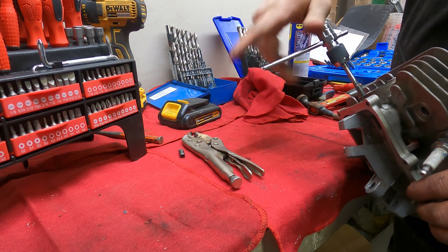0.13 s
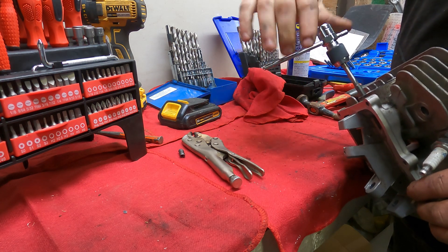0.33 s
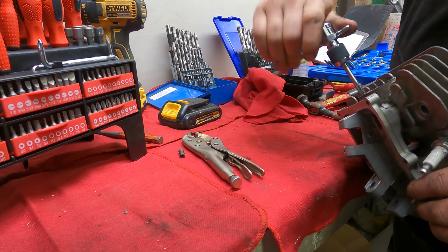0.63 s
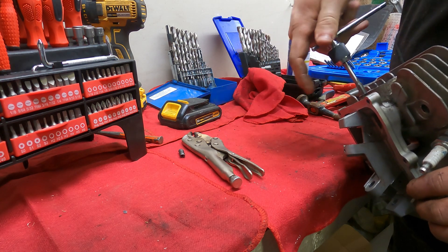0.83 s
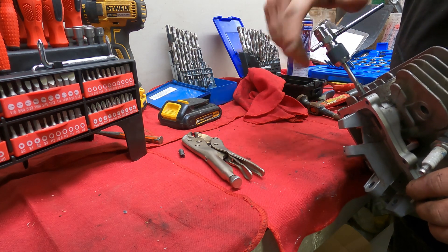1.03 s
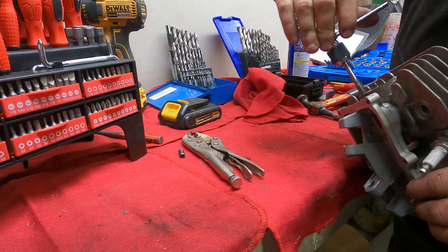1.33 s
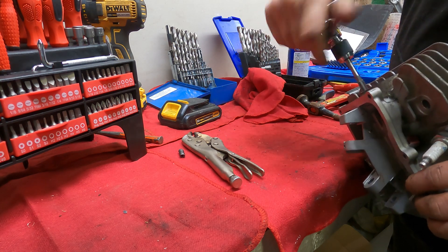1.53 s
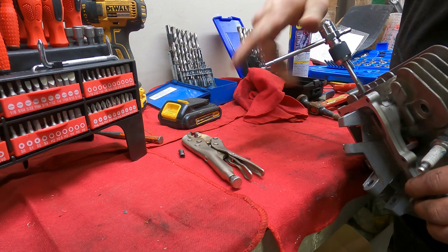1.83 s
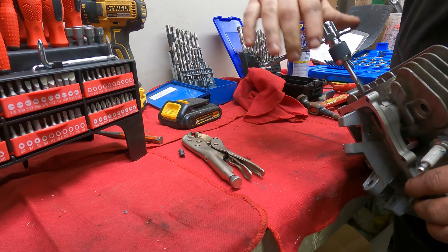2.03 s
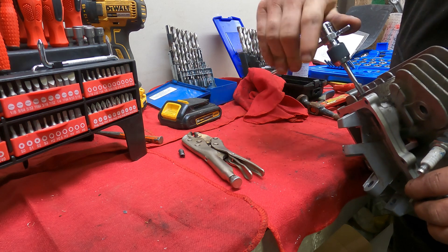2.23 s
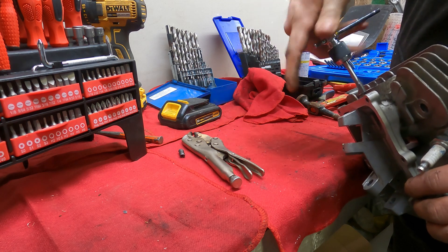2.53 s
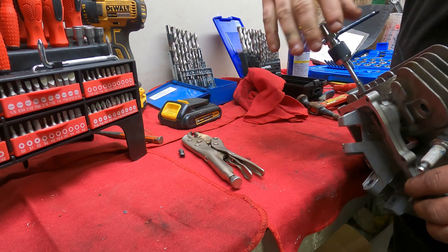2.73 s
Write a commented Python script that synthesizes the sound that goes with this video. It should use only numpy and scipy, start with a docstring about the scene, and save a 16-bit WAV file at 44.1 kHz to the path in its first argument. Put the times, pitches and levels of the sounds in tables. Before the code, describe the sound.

A steel tap wrench is spun by hand in a metal casting; its loose bar clinks sharply early and again late, with three short scraping slides between, over soft low bench thuds in a quiet room, closely miked.

```python
"""A T-handled tap wrench is spun by hand into a small engine casting: its loose steel cross-bar clicks in the
head (noise bursts and ringing modes), slides through it three times and twice drops against its stop
(the slides are rough friction noise that rings the same modes). Fingers brush the bar and a hand pats
the casting (soft noise swells). The casting rocks on a cloth-covered bench with dull thuds (low decaying
sines and rumble). Behind this lie the faint grind of the thread and the hiss of a quiet room (steady noise)."""
import sys
import numpy as np
from scipy import signal
from scipy.fft import rfft, irfft
from scipy.io import wavfile

SR = 44100
rng = np.random.default_rng(int(sys.argv[2]) if len(sys.argv) > 2 else 0)


def master_out(mix):
    """Clip the mix to full scale and print it as 16-bit PCM to the path in sys.argv[1]."""
    frames = np.transpose(np.atleast_2d(mix))
    ceiling = np.clip(frames, -1, 1)
    pcm = np.round(ceiling * 32767).astype(np.int16)
    wavfile.write(sys.argv[1], SR, pcm)


N = 127890  # length in samples
T = np.arange(N) / SR  # time in seconds
HZ = np.maximum(np.arange(N // 2 + 1) * SR / N, 1)  # frequency of each spectrum bin


def from_db(db):
    """Turn decibels into gain."""
    return 10 ** (np.asarray(db) / 20)


def rms_one(x):
    """Scale a signal to an rms of 1."""
    return x / np.sqrt(np.mean(x ** 2) + 1e-30)


def at_hz(points, hz):
    """Read a table of (Hz, value) between its points, on a log-frequency axis."""
    table_hz, values = np.transpose(points)
    return np.interp(np.log(hz), np.log(table_hz), values)


def level_over_time(points):
    """Turn a table of (seconds, dB) into a smoothly moving gain."""
    return from_db(np.interp(T, *np.transpose(points)))


def panned(db):
    """Left and right gains for a left-minus-right level in dB."""
    return from_db(np.array([[.5], [-.5]]) * db)


# How alike the two sides of the noise are. Each row: frequency in Hz, likeness from 0 (unrelated) to 1 (same).
SIDE_LIKENESS = [(60, 0.95), (150, 0.89), (350, 0.61), (1000, 0.68), (3000, 0.55), (8000, 0.88),
                 (13000, 0.48)]
# How the sound leans to one side. Each row: frequency in Hz, left minus right in dB.
SIDE_BALANCE = [(60, -.5), (170, -3.5), (350, -6), (1300, -2.5), (2800, 1), (5200, -1.5), (9000, 0),
                (13000, 6)]


def coloured(spectrum, low=10, high=SR, drive=1, tilt_db=0):
    """Stereo noise of rms 1 with a given spectrum from low to high Hz; drive shapes it in time first."""
    mid, side = rfft(rng.standard_normal((2, N)) * drive)
    alike = np.clip(at_hz(SIDE_LIKENESS, HZ), 0, 1)
    # The side part enters left and right with opposite signs
    both = np.sqrt(1 + alike) * mid + np.sqrt(1 - alike) * side * [[1], [-1]]
    in_band = (HZ >= low) * (HZ < high)
    colour = from_db(at_hz(spectrum, HZ) + tilt_db) * in_band
    return rms_one(irfft(both * panned(at_hz(SIDE_BALANCE, HZ)) * colour, N))


def roughness(depth_db, rate):
    """Stick and slip: a gain that wanders between random values, rate of them a second."""
    wander = np.interp(T * rate, np.arange(N), rng.standard_normal(N))
    return rms_one(from_db(depth_db * wander))


def tone(hz):
    """A sine of rms 1 with a random starting phase."""
    return np.sqrt(2) * np.sin(2 * np.pi * (hz * T + rng.random()))


def swell_and_decay(t, db, t60, rise_s):
    """A blow's loudness: a quick rise, then a fall of 60 dB every t60 seconds."""
    return from_db(db - 60 * t / t60) * (1 - np.exp(-t / rise_s))


def ringing(times, levels_db, t60, rise_s):
    """Envelope of a vibration: each blow adds energy, which then dies away."""
    energy = np.zeros(N)
    for s, db in zip(times, levels_db):
        start = max(int(s * SR), 0)
        t = T[:min(N - start, SR // 2)]  # each blow is followed for half a second
        energy[start:start + len(t)] += swell_and_decay(t, db, t60, rise_s) ** 2
    return np.sqrt(energy)


# Colour of the quiet room. Each row: frequency in Hz, relative level in dB per Hz.
ROOM_COLOUR = [(25, 3), (60, -7), (110, -7.5), (175, 0), (290, -6.5), (450, -18), (700, -23), (1200, -20.5),
               (2000, -22.5), (3400, -28.5), (4600, -28.5), (6500, -24), (9000, -32.5), (10300, -47),
               (15000, -49)]


def quiet_room():
    """Steady, soft noise of the room."""
    room_db = -62.5
    return from_db(room_db) * coloured(ROOM_COLOUR)


# Loudness of the grinding thread. Each row: time in seconds, level in dB.
THREAD_LEVEL = [(0, -52.5), (0.55, -59.5), (0.77, -51.5), (1.1, -62), (1.3, -57.5), (1.5, -49),
                (1.75, -53.5), (2.05, -61), (2.4, -54), (2.72, -72)]
# Colour of the grinding. Each row: frequency in Hz, relative level in dB per Hz.
THREAD_SPECTRUM = [(40, 8), (170, 10), (300, 1), (450, -11), (700, -27), (1050, -16.5), (1800, -24.5),
                   (5000, -22), (12000, -44.5)]


def thread_grind():
    """The tap grinds faintly in its thread as it turns: noise that grows and fades."""
    return level_over_time(THREAD_LEVEL) * coloured(THREAD_SPECTRUM)


THUD_RISE_S, DEEP_T60_S, HOLLOW_T60_S = .01, 0.31, 0.27


def boom(s, db, hz, t60):
    """A low mode swelling from rest at s seconds and dying away."""
    t = np.maximum(T - s, 0)
    return np.sqrt(2) * np.sin(2 * np.pi * hz * t) * swell_and_decay(t, db, t60, THUD_RISE_S)


# Rocks of the casting on the bench; its seating sets the pitch.
# Each row: start in seconds, deep level in dB, deep pitch in Hz, hollow level in dB, hollow pitch in Hz.
BENCH_THUDS = [(0.001, -49, 82.2, -51.5, 173.5), (0.078, -65, 45.6, -45.5, 177),
               (0.135, -56, 45, -48.5, 169), (0.249, -34, 70.6, -39.5, 131.6),
               (0.279, -33.5, 78.9, -38, 112.4), (0.404, -45, 72.6, -44, 169),
               (0.643, -47.5, 80.5, -47, 169.4), (0.713, -72, 68.4, -47, 164.5),
               (0.806, -35.5, 67.3, -45.5, 158), (0.861, -34, 58.6, -52, 141),
               (0.932, -40, 67, -34.5, 134.4), (0.983, -63, 102, -41.5, 164),
               (1.139, -59, 52, -48.5, 183.4), (1.201, -63, 50.6, -49.5, 180), (1.344, -47, 67, -38, 133.7),
               (1.455, -71, 71, -59, 131.5), (1.536, -71, 45, -59, 215), (1.61, -38, 81.7, -42, 110),
               (1.649, -40, 75.5, -43, 145.5), (1.774, -42.5, 68, -40, 127.7),
               (1.903, -37.5, 73.6, -36, 134), (2.108, -42, 68, -50.5, 123), (2.179, -47, 72, -54, 178.6),
               (2.228, -67, 82, -47, 169), (2.292, -35.5, 83.1, -36, 117), (2.343, -35.5, 79, -41, 123),
               (2.42, -44, 61.7, -55, 187), (2.567, -57, 92, -44, 121.3), (2.606, -50, 81, -35, 171.7)]
# The deep and the hollow range of the bench's dense rumble.
# Each row: lower edge in Hz, level in dB added to the thud's, t60 in seconds.
RUMBLE_RANGES = [(19.8, -3.5, .28), (110, -5, 0.37)]
# Colour of that rumble. Each row: frequency in Hz, relative level in dB per Hz.
RUMBLE_COLOUR = [(22, -10.5), (45, -4.5), (70, -1), (100, -6), (165, 8.5), (210, -9), (310, -14.5),
                 (420, -31.5), (600, -39)]
# Upper modes of the bench. Each row: frequency in Hz, level in dB added to the hollow one, t60 in seconds.
UPPER_BENCH_MODES = [(177, -11.5, 0.27), (232.6, -14.5, 0.14), (319.7, -18.5, 0.19)]


def bench_thuds():
    """Soft pushes through the casting set the bench booming: two low sines, dense rumble, upper modes."""
    times, deep, _, hollow, _ = np.transpose(BENCH_THUDS)
    out = 0
    for s, deep_db, deep_hz, hollow_db, hollow_hz in BENCH_THUDS:
        out = out + boom(s, deep_db, deep_hz, DEEP_T60_S)
        out = out + boom(s, hollow_db, hollow_hz, HOLLOW_T60_S)
    # Each range ends where the next begins
    tops = [row[0] for row in RUMBLE_RANGES[1:]] + [RUMBLE_COLOUR[-1][0]]
    for (low, db, t60), high, level in zip(RUMBLE_RANGES, tops, (deep, hollow)):
        out = out + coloured(RUMBLE_COLOUR, low, high) * ringing(times, level + db, t60, THUD_RISE_S)
    for hz, db, t60 in UPPER_BENCH_MODES:
        mode = tone(hz) * ringing(times, hollow + db, t60, THUD_RISE_S)
        out = out + panned(at_hz(SIDE_BALANCE, hz)) * mode
    return out


# Pats of the hand on the casting. Each row: start in seconds, level in dB.
HAND_PATS = [(0.756, -47), (1.372, -61)]
# Colour of a pat. Each row: frequency in Hz, relative level in dB per Hz.
PAT_COLOUR = [(200, -31), (420, 10), (600, -7), (1000, -21), (2500, -31), (9000, -55)]


def hand_pats():
    """Soft, dull touches of the hand: short bursts of mostly low noise."""
    times, levels = np.transpose(HAND_PATS)
    return coloured(PAT_COLOUR) * ringing(times, levels, t60=0.1, rise_s=0.0069)


SLIPS_PER_S = 500  # fast stick and slip of skin or steel

# Fingers brush along the bar.
# Each row: moment of the peak in seconds, level in dB, rise time in seconds, fall time in seconds.
FINGER_BRUSHES = [(0.887, -44.5, 0.0095, .014), (1.536, -42.5, 0.0072, 0.01), (1.562, -46, 0.0067, 0.011),
                  (2.42, -47.5, 0.01, 0.016)]
# Colour of a brush. Each row: frequency in Hz, relative level in dB per Hz.
BRUSH_COLOUR = [(200, -26), (330, 10), (480, -1), (680, -19), (1000, 1), (1110, -12.5), (1200, 8),
                (1400, -2), (1720, -6.5), (1860, 8), (2050, -13.5), (2600, -4), (3600, -17), (7000, -22),
                (14000, -45)]


def finger_brushes():
    """Skin drags briefly over the steel: rough noise that swells and fades."""
    swell = 0
    for peak_s, db, rise, fall in FINGER_BRUSHES:
        from_peak = (T - peak_s).clip(-1, 1)  # the limits keep cosh from overflowing
        swell = swell + from_db(db) / np.cosh(from_peak / np.where(T < peak_s, rise, fall))
    return swell * coloured(BRUSH_COLOUR, drive=roughness(2.5, SLIPS_PER_S))


# The bar runs through the head, one list a slide. Each row: time in seconds, level in dB.
BAR_SLIDES = [
    [(0.55, -79), (0.585, -53.5), (0.645, -50.5), (0.675, -46.5), (0.79, -43.5), (0.835, -49), (0.88, -72),
     (0.95, -78)],
    [(1.35, -65.5), (1.45, -58), (1.475, -49), (1.55, -44.5), (1.615, -46), (1.635, -50.5), (1.69, -51.5),
     (1.76, -79)],
    [(2.15, -85), (2.2, -56.5), (2.258, -53.5), (2.28, -61.5), (2.32, -43), (2.385, -52), (2.42, -46),
     (2.465, -64.5), (2.505, -61.5), (2.54, -80)],
]
# How rubbing changes the colour of the clatter. Each row: frequency in Hz, change in dB.
RUBBING_TILT = [(600, -8), (2000, 10), (2600, 1.5), (4200, -2.5), (5500, 1), (9000, -1), (12500, 0.5),
                (15000, 9)]
# Dense upper modes of wrench and casting, also used by the clicks.
# Each row: frequency in Hz, relative level in dB per Hz.
CLATTER_COLOUR = [(550, -22), (750, -21.5), (1030, -9.5), (1500, -23.5), (2150, -25), (2400, -9), (2700, 8),
                  (2950, -11.5), (3400, -16.5), (4100, 0), (4550, -14.5), (4900, 4), (5150, 6), (5450, 0.5),
                  (5750, -12), (6600, -15.5), (7400, -14), (8100, -16.5), (8650, -13.5), (9400, -24.5),
                  (10200, -28), (12000, -29), (13500, -33), (15000, -63)]
# Clear modes of the steel wrench, also used by the clicks. Each row: frequency in Hz, relative level when
# struck in dB, t60 in seconds, relative level when rubbed in dB, left minus right in dB.
STEEL_MODES = [(1018, 1, .12, -18.5, -2.5), (1085, -8, 0.083, -29, 3), (1190, -12.5, 0.059, -29, 6),
               (2318, -18, 0.23, -15, 1), (2576, -6.5, 0.26, -7.5, -6.5), (2627, -5, 0.088, -24, -19.5),
               (2739, -1.5, 0.27, -15, -3), (3084, 2, 0.17, -9, -5), (3691, 1, 0.19, -13.5, -7.5),
               (4030, -9.5, 0.089, -17, -18), (4266, -6.5, 0.14, -7.5, 0.5), (5100, -8, 0.069, -7.5, -3),
               (5100, -1.5, 0.054, -16.5, -2), (5870, -10, .07, -24, 1), (5970, -19, 0.26, -18.5, -10),
               (6550, -7.5, 0.14, -15.5, -1), (6760, -10.5, 0.16, -24, 11), (7680, -23, 0.19, -17.5, 3),
               (8640, -8.5, 0.1, -17.5, 2.5), (9270, -14, 0.11, -29, 0), (10130, -22, 0.11, -54, 10),
               (10830, -30, 0.19, -43, 1)]


def bar_slides():
    """Rough friction rubs the wrench: its dense modes hiss and its clear modes ring as resonant filters."""
    ring_db, hiss_db = -7, -5
    level = 0
    for rows in BAR_SLIDES:
        sliding = (T >= rows[0][0]) & (T <= rows[-1][0])
        level = level + sliding * level_over_time(rows)
    # Fast slips together with slower catches, 60 a second
    slips = roughness(2.5, SLIPS_PER_S) * roughness(1, 60)
    hiss = coloured(CLATTER_COLOUR, drive=slips, tilt_db=at_hz(RUBBING_TILT, HZ))
    out = from_db(hiss_db) * level * hiss
    friction = level * slips * rng.standard_normal(N)
    for hz, _, t60, db, pan_db in STEEL_MODES:
        r = from_db(-60 / (t60 * SR))  # loss per sample
        w = 2 * np.pi * hz / SR  # turn per sample
        feed = np.sqrt((1 - r * r) / 2) * np.array([1, 0, -1])
        ring = signal.lfilter(feed, [1, -2 * r * np.cos(w), r * r], friction)
        out = out + from_db(ring_db + db) * panned(pan_db) * ring
    return out


def range_of(ranges, hz):
    """Number of the range in which a mode lies."""
    return max(sum(hz >= row[0] for row in ranges) - 1, 0)


# The bar strikes the head; the place of contact sets the colour. Each row: start in seconds, then the
# levels in dB of knock, low ring, ping, bell, clank and treble.
BAR_CLICKS = [(0.001, -67, -54, -57.5, -71, -55, -61), (0.0716, -75, -66, -75, -70, -61, -71.5),
              (0.2448, -53.5, -37, -40, -37, -34.5, -40), (0.2635, -48.5, -34, -40.5, -35, -42.5, -48),
              (0.288, -58.5, -45, -62, -56, -65, -62), (0.4015, -65.5, -44.5, -48.5, -59, -52.5, -58),
              (0.6656, -88, -53.5, -74, -72, -50.5, -66), (0.8118, -64, -51.5, -59, -72, -46, -49),
              (0.93, -57.5, -61.5, -82, -78, -77, -77), (0.984, -62, -51, -62, -72, -64, -68),
              (1.182, -70.5, -71.5, -85, -91, -82, -87), (1.21, -67, -59.5, -74, -93, -72, -83),
              (1.321, -71, -61.5, -83, -81, -66, -75), (1.338, -54.5, -55, -66, -60, -61.5, -62.5),
              (1.768, -62.5, -62, -74, -62, -64, -66), (1.905, -61.5, -57, -60.5, -61, -46, -62.5),
              (2.103, -62.5, -51, -57, -65, -50, -60.5), (2.187, -89, -65, -81, -79, -58.5, -71),
              (2.2862, -60, -44.5, -45, -51, -40, -36), (2.563, -56, -53.5, -68, -65, -59, -74),
              (2.6015, -55.5, -47.5, -62.5, -57.5, -55.5, -62)]
# The six ranges of those levels, from knock to treble.
# Each row: lower edge in Hz, level in dB that the dense clatter adds, t60 of the clatter in seconds.
CLICK_RANGES = [(560, 0.5, 0.16), (2080, -2, 0.17), (2880, -2.5, 0.056), (3470, -5, 0.11),
                (4050, 1.5, 0.033), (5418, 6, 0.042)]


def bar_clicks():
    """Steel on steel: a crack, a short dense clatter with a faint room tail, and long clear modes."""
    rise_s, sizzle_from_hz = .001, 9200
    times, *levels = np.transpose(BAR_CLICKS)
    treble = levels[-1]
    # Harder blows are brighter: the sizzle changes by an extra 0.38 dB per dB of treble
    sizzle = treble - 2.5 + 0.38 * (treble - treble.max())
    out = coloured(CLATTER_COLOUR, sizzle_from_hz) * ringing(times, sizzle, 0.048, rise_s)
    tops = [row[0] for row in CLICK_RANGES[1:]] + [sizzle_from_hz]
    for (low, db, t60), high, level in zip(CLICK_RANGES, tops, levels):
        # Crack, clatter and tail: added level in dB, t60 in seconds
        stages = [(3, 0.06), (0, t60), (-18, 0.29)]
        energy = 0
        for stage_db, stage_t60 in stages:
            energy = energy + ringing(times, level + db + stage_db, stage_t60, rise_s) ** 2
        out = out + coloured(CLATTER_COLOUR, low, high) * np.sqrt(energy)
    for hz, db, t60, _, pan_db in STEEL_MODES:
        level = levels[range_of(CLICK_RANGES, hz)]
        out = out + panned(pan_db) * tone(hz) * ringing(times, level + db, t60, rise_s)
    return out


def scene():
    """Room, thread and bench under the hand and the rattling bar."""
    background = quiet_room() + thread_grind() + bench_thuds()
    hand = hand_pats() + finger_brushes()
    return background + hand + bar_slides() + bar_clicks()


def record(dry):
    """A steep low-pass filter removes what lies above 15 kHz."""
    low_pass = signal.ellip(10, .2, 80, 15000, fs=SR, output="sos")
    return signal.sosfilt(low_pass, dry)


dry = scene()
out = record(dry)
master_out(out)
```